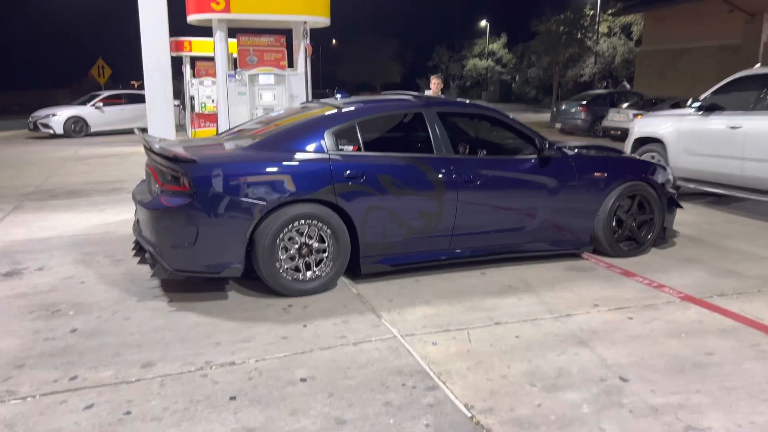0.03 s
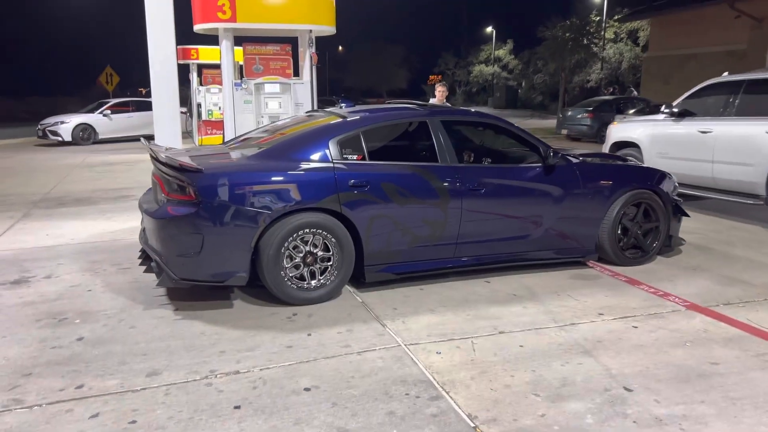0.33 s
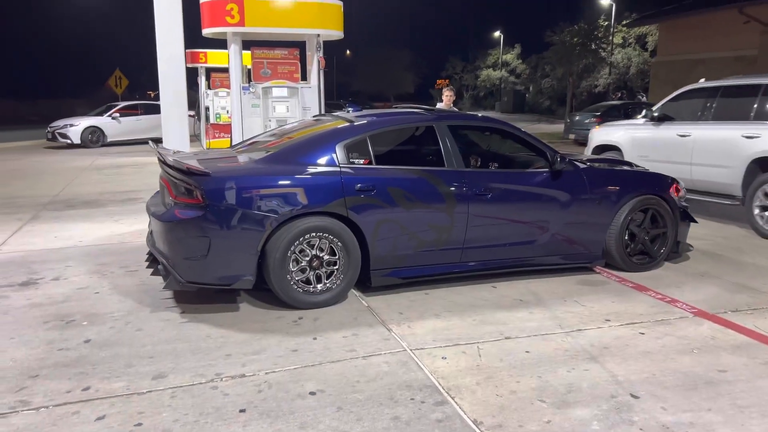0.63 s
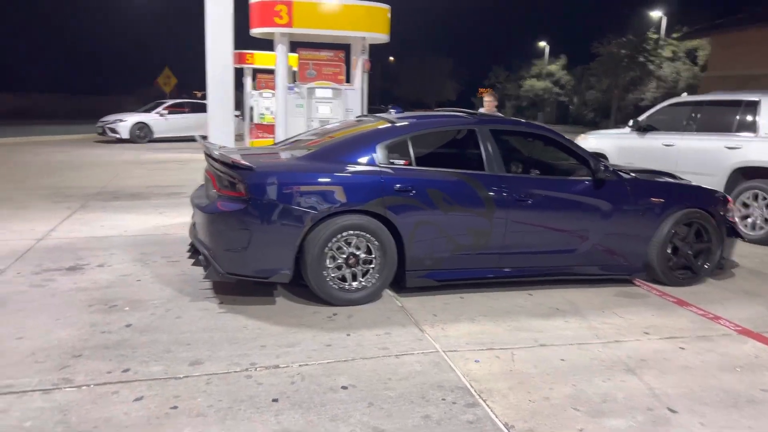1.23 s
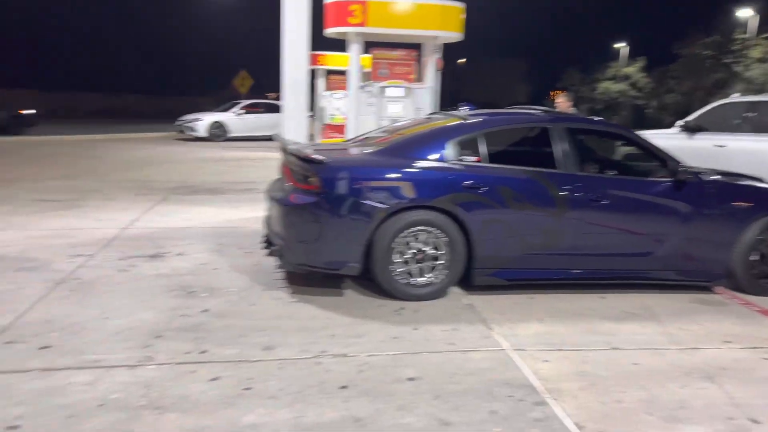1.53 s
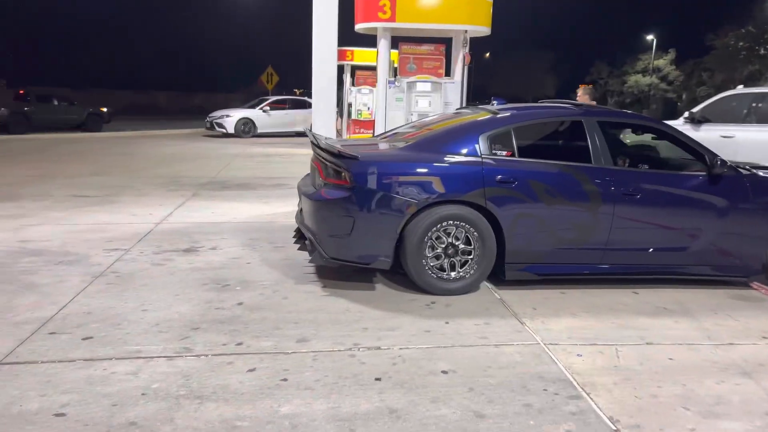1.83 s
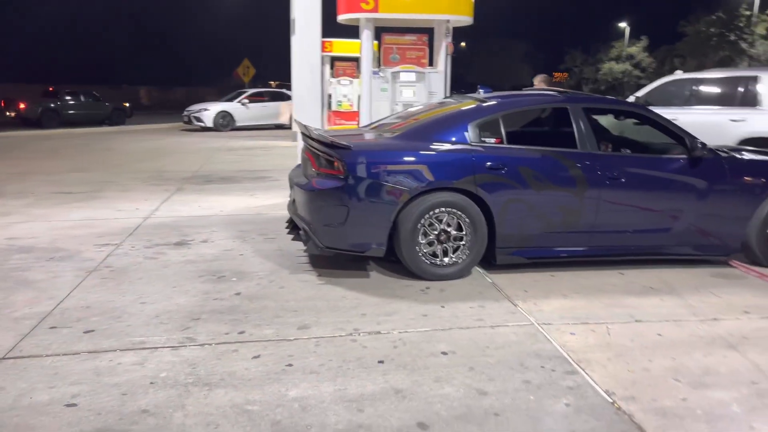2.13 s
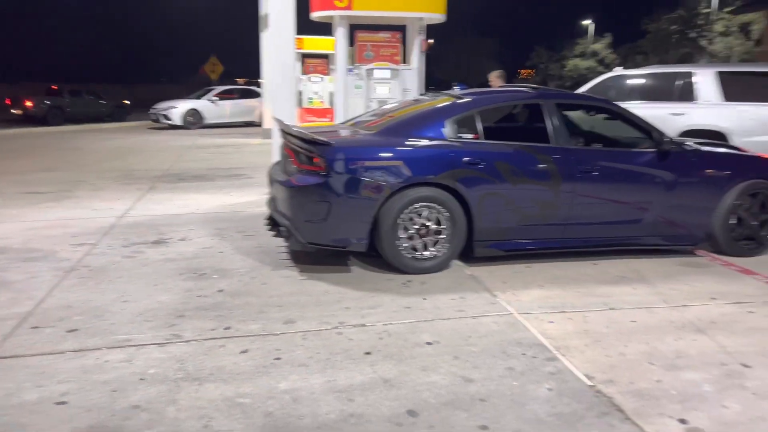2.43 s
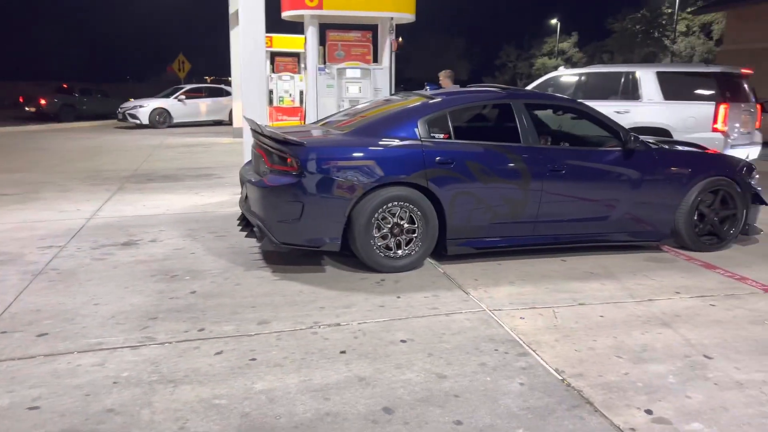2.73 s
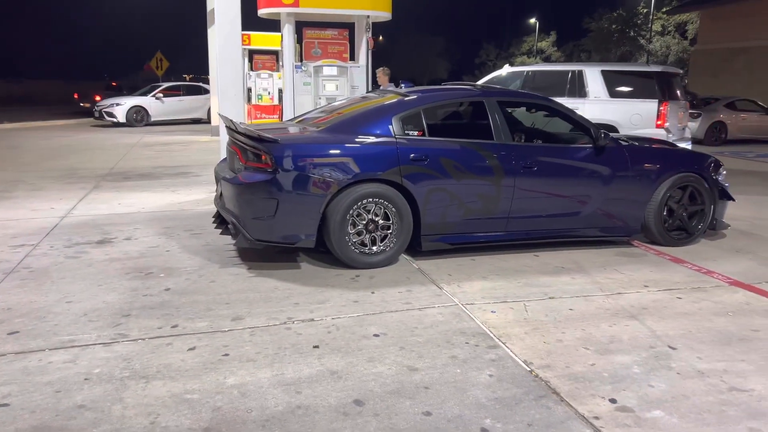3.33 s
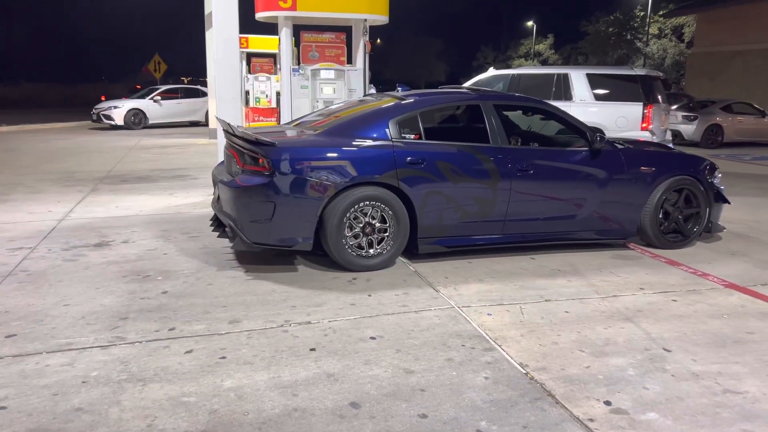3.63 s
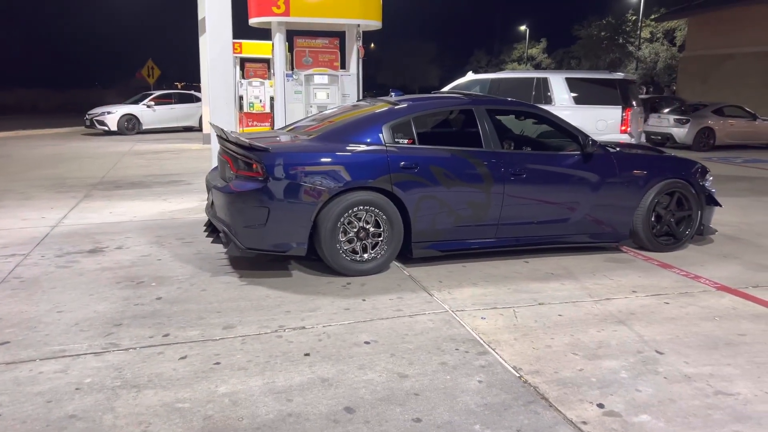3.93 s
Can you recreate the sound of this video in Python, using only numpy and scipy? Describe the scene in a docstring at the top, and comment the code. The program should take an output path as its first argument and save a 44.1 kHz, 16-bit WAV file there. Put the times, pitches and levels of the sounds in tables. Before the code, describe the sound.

A car engine idles low and steady before its revs climb with a raspy, burbling exhaust.

```python
"""A deep, even boom: a V8 car idles on a concrete forecourt at night. After two seconds the revs climb
and the exhaust turns to a lumpy burble. Eight unequal firings ring the pipes, gas rasps with each,
the valve gear ticks in a pattern that repeats once a cycle, and a hiss swells with the revs.
The canopy overhead gives a short echo, and distant traffic rumbles underneath."""
import sys
import numpy as np
from scipy import signal
from scipy.fft import rfft, irfft
from scipy.io import wavfile
from scipy.ndimage import uniform_filter1d

SR = 44100
rng = np.random.default_rng(int(sys.argv[2]) if len(sys.argv) > 2 else 0)


def to_wav(s):
    """Save 16-bit WAV."""
    ch = np.atleast_2d(s).T  # columns
    pcm = np.round(np.clip(ch, -1, 1) * 32767)  # PCM
    wavfile.write(sys.argv[1], SR, pcm.astype(np.int16))


N = 176400
T, FREQS = np.arange(N) / SR, np.arange(N // 2 + 1) * SR / N


def undb(db):
    """Decibels to gain."""
    return 10 ** (np.asarray(db) / 20)


def unit(x):
    """Scale to rms 1."""
    return x / np.sqrt(np.mean(x ** 2))


def curve(table):
    """Each column of a table, joined by straight lines in time."""
    times, *columns = np.array(table).T
    return [np.interp(T, times, column) for column in columns]


def pan(db):
    """Stereo gains; db is left minus right."""
    return undb(np.array([[db], [-db]]) / 2)


def noise(width):
    """Stereo noise; width is side over mid."""
    mid, side = rng.standard_normal((2, N))
    return unit(np.array([mid + width * side, mid - width * side]))


def wander(per_second):
    """A smooth random drift with a spread of 1."""
    hold = int(SR / per_second)
    return unit(uniform_filter1d(rng.standard_normal(N)[np.arange(N) // hold], size=hold))


def pulses(times, sizes):
    """One click of the given size at each time."""
    return np.bincount((times * SR).astype(int), sizes, N)[:N]


def puffs(times, sizes, firing_hz, decay_periods):
    """An envelope that jumps at each given time, then dies away."""
    last = np.maximum(np.searchsorted(times, T) - 1, 0)
    return unit(sizes[last] * np.exp(-np.abs(T - times[last]) * firing_hz / decay_periods))


def colour(x, points):
    """Shape a sound with an EQ curve that falls steeply past both ends."""
    hz, db = np.array(points).T
    gain = undb(np.interp(np.log(FREQS + 1), np.log(hz), db))
    skirts = np.minimum(FREQS / hz[0], 1) ** 4 * np.minimum(hz[-1] / (FREQS + 1), 1) ** 4
    return unit(irfft(rfft(x) * gain * skirts, N))


def ring(x, modes):
    """Pass a sound through a body with steep resonances."""
    gain = sum(undb(db) / (1 + (2 * (FREQS - hz) / width) ** 2) for hz, width, db in modes)
    low_cut = (FREQS + 1) / (FREQS + modes[0][0])
    cepstrum = irfft(np.log(gain * low_cut), N)
    causal = 2 * cepstrum * (T < T[-1] / 2)  # the ringing follows the strike
    response = irfft(np.exp(rfft(causal)), N)[:N // 8]
    return unit(signal.fftconvolve(np.atleast_2d(x), response[None], axes=1)[:, :N])


def traffic():
    """Distant traffic blends into a steady low rumble."""
    # The rumble's spectrum. Each row: frequency in Hz, relative level in dB.
    rumble_eq = [(20, -19), (50, -1), (100, 7), (300, -37), (600, -23), (1000, -15.5), (2500, -23.5),
                 (5000, -55)]
    return undb(-32.5) * colour(noise(width=0.058), rumble_eq)


def canopy(x, t60_s=0.2, echo_db=-16):
    """Roof and ground add a short diffuse echo."""
    tail = rng.standard_normal((2, SR // 2)) * np.exp(-np.log(1000) * T[:SR // 2] / t60_s)
    tail = tail / np.sqrt(np.sum(tail ** 2, axis=1, keepdims=True))
    return x + undb(echo_db) * signal.fftconvolve(x, tail, axes=1)[:, :N]


def flares():
    """Brief narrow rasps swell and fade over the engine."""
    # The rasps. Each row: peak time in seconds, centre in Hz, half-width in Hz, length in seconds,
    # level in dB.
    swells = [(1.53, 2570, 606, .06, -38), (1.623, 2150, 350, 0.092, -39), (2.173, 1650, 220, 0.066, -39),
              (2.258, 1330, 260, 0.041, -32.5), (2.493, 1180, 200, 0.031, -36)]
    out = 0
    for peak_s, hz, width, length, db in swells:
        rasp = colour(noise(width=0.33), [(hz - width, -15), (hz, 0), (hz + width, -15)])
        out = out + rasp * undb(db) * np.exp(-2 * ((T - peak_s) / length) ** 2)
    return out


def valve_gear(times, knock_db, tick_db, firing_hz):
    """Struck engine parts ring with knocks and brighter ticks."""
    # The parts' resonances. Each row: frequency in Hz, width in Hz, relative level in dB.
    knock_modes = [(854, 56, -1.5), (655, 27, -8)]
    tick_modes = [(1888, 104, 6.5), (2473, 470, -7), (1510, 320, -9)]
    # The ticks' fade. Each row: time in seconds, level in dB.
    tick_levels = [(0, -42.5), (1.2, -40), (1.6, -39.5), (2.3, -39), (2.7, -49.5), (4, -65)]
    knocks = ring(pulses(times, undb(knock_db)), knock_modes)
    strikes = noise(width=0.28) * puffs(times, undb(tick_db), firing_hz, decay_periods=0.26)
    ticks = ring(strikes, tick_modes)
    return (knocks * undb(-41) + ticks * undb(curve(tick_levels)[0])) * pan(-3.5)


def tailpipe(x, round_trip_hz=168.66, reflection=0.32):
    """Sound runs to and fro in the pipe, which gives it a hollow colour."""
    round_trip = reflection * np.exp(-2j * np.pi * FREQS / round_trip_hz)
    return unit(irfft(rfft(x) / (1 - round_trip), N))


def gas(times, sizes, firing_hz):
    """Turbulence: a pulsing tailpipe rasp, a hiss with an airy top, and smooth intake air."""
    # Spectra of the four gas noises. Each row: frequency in Hz, relative level in dB.
    rasp_eq = [(420, 1.5), (560, -6), (850, 3), (1100, -4.5), (1400, -3), (2000, -8.5), (2600, -14),
               (3400, -27.5)]
    hiss_eq = [(2500, 7), (4000, -1), (5500, 0.5), (7000, 4.5)]
    air_eq = [(6500, -4), (8000, 0), (12200, -2), (15000, -10)]
    intake_eq = [(3400, -4), (4000, -9), (5000, -2), (6500, -9.5)]
    # The swell of the gas. Each row: time in seconds, rasp level in dB, relative hiss level in dB.
    gas_levels = [(0, -33.5, -47), (1.44, -35.5, -49), (2.33, -33, -48.5), (2.41, -33.5, -47),
                  (2.61, -35.5, -52), (2.92, -28, -44.5), (3.06, -22, -41), (3.12, -20.5, -39),
                  (3.45, -31.5, -51), (3.7, -26.5, -47), (3.97, -25, -46)]
    # The swell of the airy top. Each row: time in seconds, level in dB.
    air_levels = [(0, -55.5), (1.2, -56), (2.37, -55.5), (2.63, -61), (3.12, -45), (3.45, -62.5),
                  (3.78, -52.5), (4, -54)]
    rasp_db, hiss_db = curve(gas_levels)
    flow = 1 + puffs(times, sizes, firing_hz, decay_periods=0.65)  # puffs ride on a steady stream
    rasp = tailpipe(colour(noise(width=0.52) * flow, rasp_eq)) * undb(rasp_db) * pan(-3)
    hiss = colour(noise(width=1) * flow, hiss_eq)
    intake = colour(noise(width=1), intake_eq) * undb(-5) * pan(15)
    air = colour(noise(width=0.3) * flow, air_eq) * undb(curve(air_levels)[0])
    return rasp + (hiss + intake) * undb(hiss_db - 1.5) + air


def burble(times, idle_sizes, load_sizes, throttle, firing_hz):
    """Uneven firings ring the pipes; the throttle brings deeper chugs, which thin out with speed."""
    # Exhaust pipe resonances. Each row: frequency in Hz, width in Hz, relative level in dB at idle,
    # the same under load.
    pipe_modes = [(66.2, 16, -9, 10), (108.7, 14.7, 1, 8), (150.2, 10.4, 9, -5.5), (163.05, 8.96, -13, 9),
                  (210.7, 16.2, -0.5, -2), (245.37, 12.7, 8.5, 4), (308.1, 24.2, 1.5, -2.5),
                  (339, 29.4, -7.5, -5), (374.9, 13.7, 2, -8), (428.7, 32, -24, -15),
                  (535.8, 16.3, -61, -18)]
    # The burble's swell. Each row: time in seconds, relative level in dB.
    burble_levels = [(0, -22), (1.25, -24.5), (1.6, -22), (2.1, -22.5), (2.35, -20), (2.65, -20.5),
                     (3.06, -14.5), (3.25, -15), (3.5, -17.5), (3.66, -14.5), (4, -16)]
    chug_hz, chug_fade_db_per_octave = 176.2, 10.5
    # Taking away most or all of the average firing leaves the lumps.
    idle_lumps = pulses(times, idle_sizes - 0.876 * idle_sizes.mean())
    load_lumps = pulses(times, load_sizes - load_sizes.mean())
    idle = ring(idle_lumps, [(hz, width, db) for hz, width, db, _ in pipe_modes])[0]
    loaded = ring(load_lumps, [(hz, width, db) for hz, width, _, db in pipe_modes])[0]
    chugs = signal.sosfiltfilt(signal.butter(4, chug_hz, fs=SR, output="sos"), loaded)
    octaves_up = np.log2(firing_hz / firing_hz[0])
    loaded = loaded - chugs * (1 - undb(-chug_fade_db_per_octave * octaves_up))
    pipes = (1 - throttle) * idle + throttle * loaded
    running_rms = np.sqrt(uniform_filter1d(pipes ** 2, size=SR // 8) + 1e-9)
    return pipes / running_rms * undb(curve(burble_levels)[0] + 2) * pan(-1)


def boom(phase, throttle, throb_db=2):
    """The even gas flow hums at the firing rate and its octave, clean at idle, throbbing under load."""
    # The exhaust boom. Each row: time in seconds, fundamental level in dB, octave level in dB.
    boom_levels = [(0, -12.5, -31), (1.5, -11.5, -31), (2.22, -11, -35), (2.33, -17.5, -28),
                   (2.65, -25.5, -32), (2.85, -29, -27), (3.03, -25, -28), (3.14, -15, -27),
                   (3.24, -13.5, -14), (3.33, -21, -15.5), (3.55, -27, -18), (3.75, -34, -24.5),
                   (4, -19, -20)]
    fundamental_db, octave_db = curve(boom_levels)
    throb = throb_db * throttle * wander(per_second=15)
    fundamental = undb(fundamental_db + throb) * np.cos(2 * np.pi * phase)
    octave = undb(octave_db) * np.sin(4 * np.pi * phase)
    return np.sqrt(2) * (fundamental + octave)


def scene():
    """The crank sets the firings; opening the throttle shifts the balance between the cylinders."""
    # Engine speed. Each row: time in seconds, firings per second.
    revs = [(0, 62.52), (.5, 61.62), (1, 62), (1.5, 60.73), (1.9, 60.75), (2.1, 61.92), (2.3, 69.54),
            (2.5, 71.74), (2.7, 71.25), (2.85, 82.1), (3.05, 102.7), (3.12, 109.1), (3.22, 114.6),
            (3.38, 125.5), (3.52, 121.5), (3.7, 131.4), (3.85, 140.6), (4, 151.7)]
    # Cylinders in firing order. Each row: delay in firing periods, then relative levels in dB of
    # exhaust at idle, exhaust under load, knock and valve tick.
    cylinders = [(0.606, -2, 0, -3, 0), (0.669, -2.47, -3, -3.5, 1.5), (0.6026, -1.97, -3.5, -7.5, -0.5),
                 (0.742, -1.55, .5, -29, -8), (0.743, -2.5, -1, -28, 1.5), (0.97, -2.5, -4, -9, -6),
                 (0.665, -2, -1.5, -26, -16), (0.735, -2.5, -1, -21, -3.5)]
    throttle_opens_s, throttle_rise_s, right_lag_s = 2.25, 0.13, 0.00008
    valve_delay, jitter = 0.47, 0.02  # in firing periods
    firing_hz, = curve(revs)
    phase = np.cumsum(firing_hz) / SR
    throttle = np.clip((T - throttle_opens_s) / throttle_rise_s, 0, 1)
    firing = np.arange(int(phase[-1]))
    delay, idle_db, load_db, knock_db, tick_db = np.array(cylinders)[firing % len(cylinders)].T
    # Every firing strays a little in timing and strength.
    late, strength, knock, tick, slack = rng.standard_normal((N // 200, 5))[firing].T
    firing_times = np.sort(np.interp(firing + delay + jitter * late, phase, T))
    valve_times = np.sort(np.interp(firing + valve_delay + jitter * slack, phase, T))
    idle_sizes, load_sizes = undb(idle_db + 0.39 * strength), undb(load_db + 1.6 * strength)
    sizes = idle_sizes + (load_sizes - idle_sizes) * np.interp(firing_times, T, throttle)
    clatter = valve_gear(valve_times, knock_db + 1.5 * knock, tick_db + 4 * tick, firing_hz)
    pipes = burble(firing_times, idle_sizes, load_sizes, throttle, firing_hz)
    car = pipes + gas(valve_times, sizes, firing_hz) + clatter + flares()
    left, right = boom(phase, throttle) + canopy(car)
    right = right[np.maximum(np.arange(N) - round(right_lag_s * SR), 0)]  # arrives a touch later
    return np.array([left, right]) + traffic()


def record(dry, top_hz=15300):
    """Round off the highest peaks and cut the extreme treble."""
    rounded = dry / (1 + dry ** 8) ** (1 / 8)
    return signal.sosfilt(signal.ellip(8, .2, 70, top_hz, fs=SR, output="sos"), rounded)


dry = scene()
out = record(dry)
to_wav(out)
```